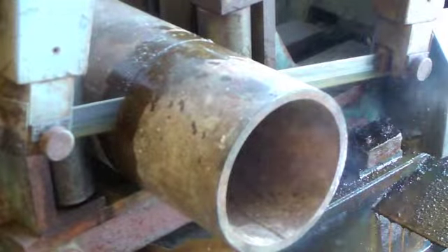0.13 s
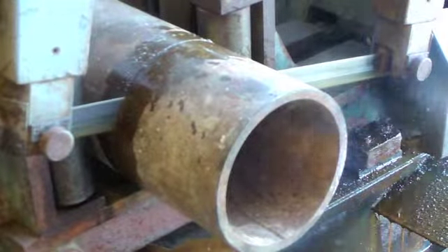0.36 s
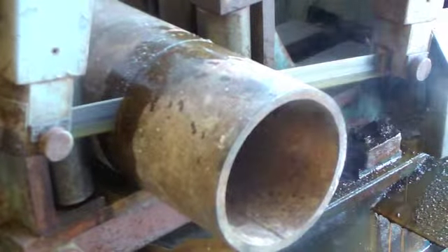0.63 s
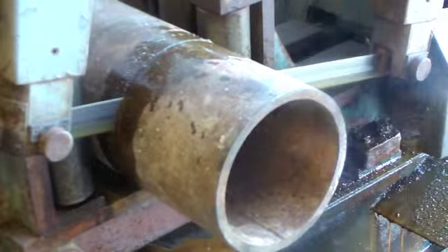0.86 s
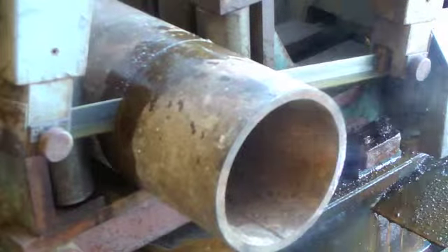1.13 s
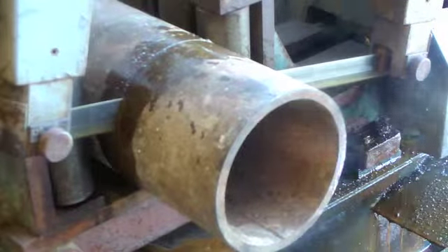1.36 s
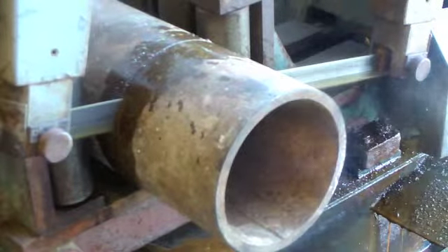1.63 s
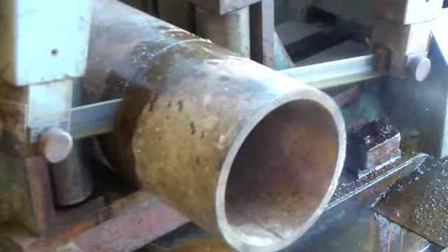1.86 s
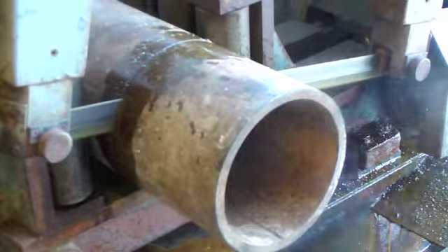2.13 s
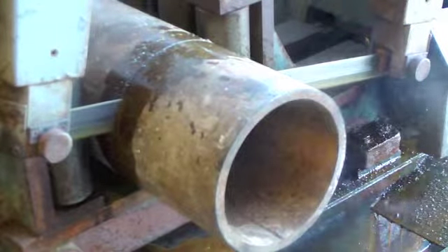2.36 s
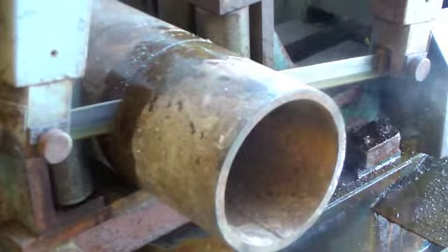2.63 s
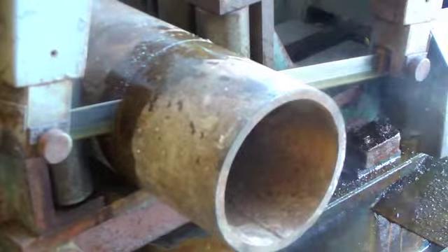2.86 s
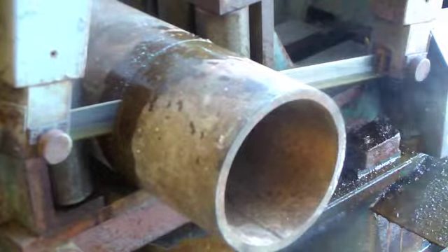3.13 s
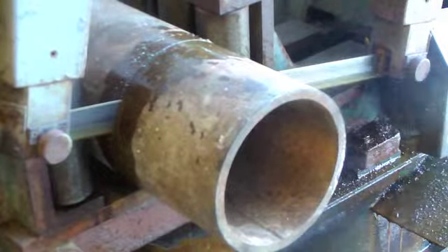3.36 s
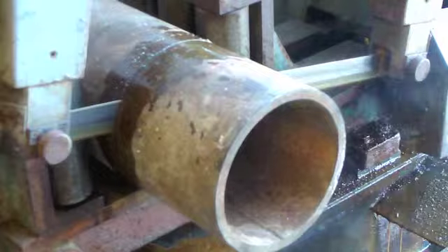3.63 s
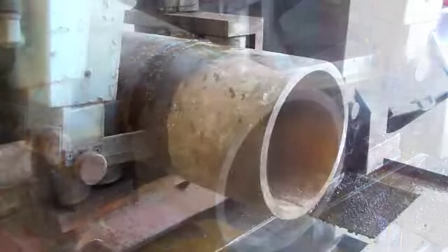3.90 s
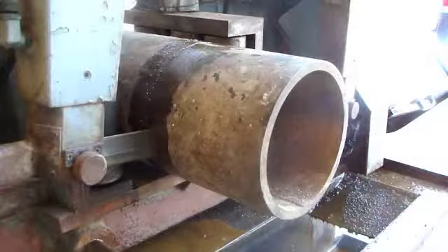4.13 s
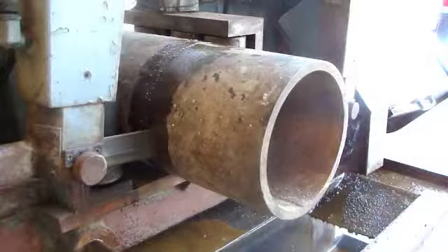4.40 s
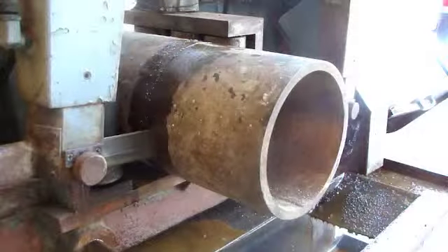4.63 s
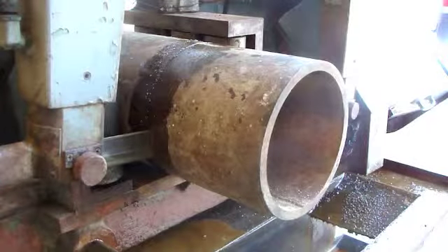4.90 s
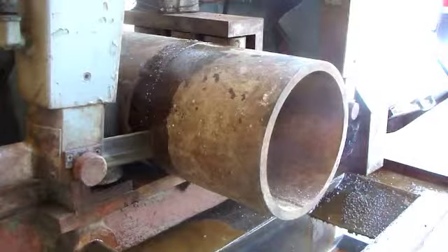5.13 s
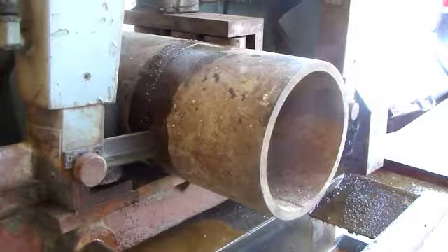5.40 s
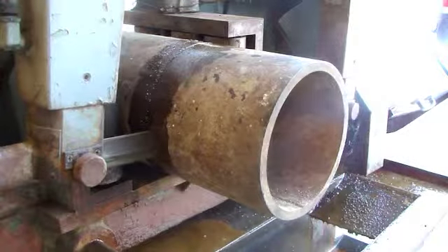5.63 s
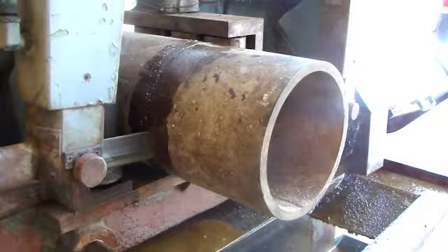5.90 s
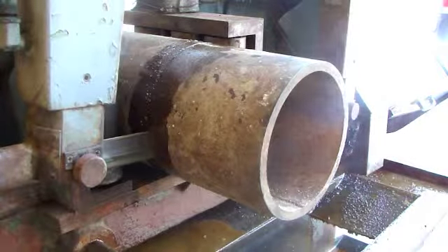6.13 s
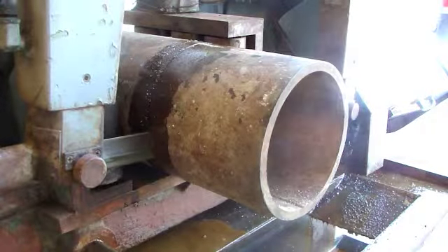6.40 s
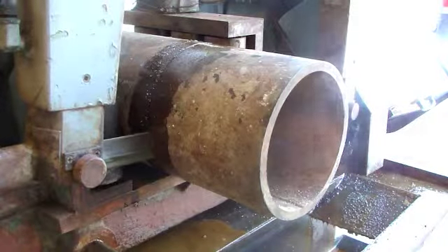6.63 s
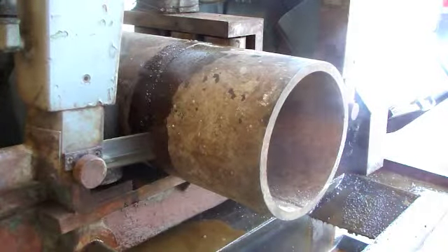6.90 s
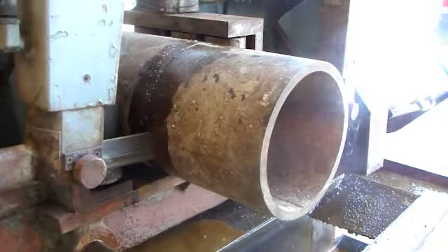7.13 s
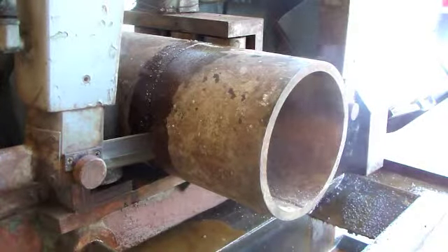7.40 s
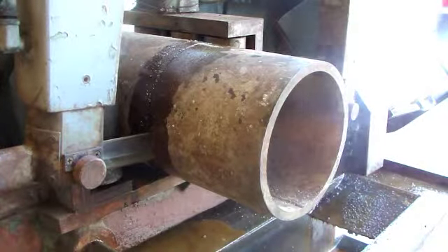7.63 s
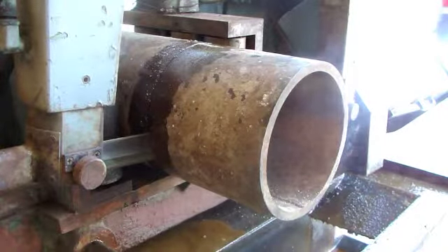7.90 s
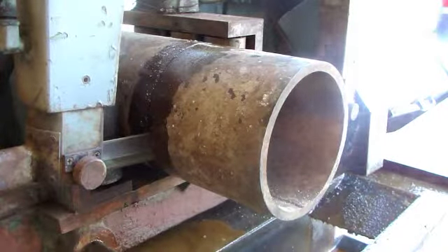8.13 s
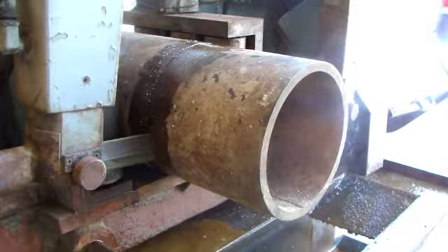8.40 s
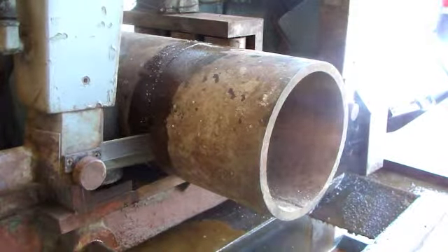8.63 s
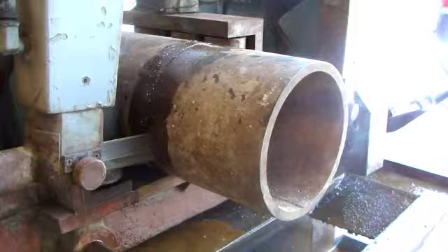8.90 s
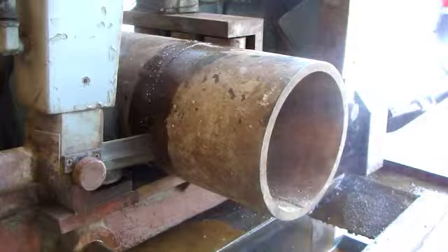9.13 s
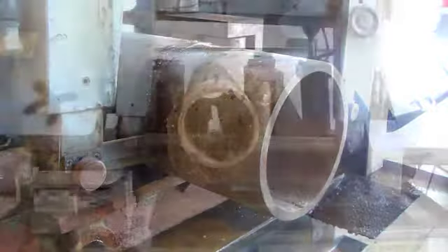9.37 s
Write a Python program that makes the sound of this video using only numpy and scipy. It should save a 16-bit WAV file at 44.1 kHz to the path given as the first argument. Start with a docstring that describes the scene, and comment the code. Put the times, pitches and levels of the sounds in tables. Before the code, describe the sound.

A band saw grinds steadily through a thick steel pipe, gritty and hissing with thin metallic squeals, then cuts louder and ends in a broad roar.

```python
"""A dense, gritty stream of tearing steel: a horizontal band saw cuts a thick pipe, heard through one
microphone. Noise and cracks, pulsed by the teeth, ring the modes of pipe, blade and frame; turning parts swell
the bite. Two thin rings and short squeaks sing above it, and a motor hums below as steady lines over filtered
noise. Midway the scene changes, blending from a shallow stage of the cut into a deeper, louder one, and near
the end the sound turns abruptly broader and louder."""
import sys
import numpy as np
from scipy import signal
from scipy.fft import rfft, irfft, next_fast_len
from scipy.io import wavfile
from scipy.ndimage import uniform_filter1d

SR = 44100
rng = np.random.default_rng(int(sys.argv[2]) if len(sys.argv) > 2 else 0)


def log_audio(samples):
    """Write samples as a 16-bit WAV file to the path given in sys.argv[1]."""
    # one column per channel
    frames = np.atleast_2d(samples).T
    # limit to full scale, then quantise
    limited = np.clip(frames, -1, 1)
    pcm = np.round(limited * 32767).astype(np.int16)
    wavfile.write(sys.argv[1], SR, pcm)


def rack_gain(trim_db):
    """Turn a fader trim in dB into the linear factor to multiply a signal by."""
    fader = np.asarray(trim_db, float)
    return 10 ** (fader / 20)


N = 419391

# borders between the six regions of the cut's spectrum: (frequency [Hz])
REGION_EDGES_HZ = [310, 750, 1450, 2470, 4000]
# resonances of pipe and frame in each stage: (frequency [Hz], width [Hz], relative level [dB])
SHALLOW_MODES = [(244, 43, -8), (325, 8, -23), (399, 15, -9), (453, 42, -10), (538, 203, -16),
                 (693, 10, -10), (751, 62, -14), (834, 45, -6), (902, 8, -9), (1139, 37, -6), (1199, 20, 1),
                 (1266, 71, -1), (1493, 146, -10), (1588, 61, -6), (1706, 58, -4), (1818, 214, -6),
                 (1999, 90, 1), (2102, 14, -8), (2296, 146, -5), (2575, 62, -1), (2973, 54, -2),
                 (3084, 142, -4), (3335, 167, -1), (3385, 40, -3), (3910, 40, -3)]
DEEP_MODES = [(243, 35, -4), (322, 8, -14), (396, 11, -8), (451, 30, -11), (551, 9, -19), (695, 22, -8),
              (783, 52, -10), (852, 40, -4), (898, 11, -3), (935, 9, -5), (971, 8, -10), (1068, 51, -2),
              (1266, 71, -4), (1540, 46, -8), (1635, 81, -7), (1827, 88, -2), (1986, 58, 0), (2064, 84, 4),
              (2263, 257, -3), (2406, 32, -2), (2720, 138, 3), (3197, 26, 3), (3369, 37, 0), (3428, 42, -4),
              (3536, 140, 0), (3704, 27, 3), (3888, 12, -4)]
# start and end of the blend from the shallow to the deep stage: (time [s])
BLEND_S = [3.76, 4.28]
# turning parts, one row for each stage: (blade wheel [Hz], guide roller [Hz], faster shaft [Hz])
TURN_HZ = [(1.05, 2.86, 6.03), (0.98, 2.86, 6.03)]
# time constants in which the stages calm down: (shallow [s], deep [s])
SETTLE_S = [0.13, 1.5]


def rms_one(x):
    """Scale to unit rms."""
    return x / np.sqrt(np.mean(x ** 2) + 1e-20)


def drift(rate):
    """Slow chance of spread 1: coarse noise through a double one-pole low-pass at rate (Hz)."""
    r = np.exp(-80 * np.pi * rate / SR)   # the coarse noise has one value per 40 samples
    coarse = rng.standard_normal(N // 40 + 1002)
    slow = signal.lfilter([1], [1, -2 * r, r * r], coarse)[1000:]
    return np.interp(np.arange(N) / 40, np.arange(len(slow)), rms_one(slow))


def resonate(x, hz, width):
    """A resonance with gain 1 on top, passed twice for steep skirts."""
    r = np.exp(-np.pi * max(width, 2) * 1.55 / SR)   # 1.55 makes up for the narrowing by two passes
    section = [(1 - r * r) / 2, 0, (r * r - 1) / 2, 1, -2 * r * np.cos(2 * np.pi * hz / SR), r * r]
    return signal.sosfilt([section, section], x)


def coloured(x, spectrum):
    """Give a white signal a spectrum; one row for each region between the edges."""
    size = next_fast_len(N)
    hz = np.maximum(np.arange(size // 2 + 1) * SR / size, 1)
    points = np.array(spectrum)
    curve_db = np.interp(np.log(hz), np.log(points[:, 0]), points[:, 1])
    shaped = rfft(x, size) * rack_gain(curve_db)
    region = np.searchsorted(REGION_EDGES_HZ, hz)
    return np.array([irfft(shaped * (region == k), size)[:N] for k in range(len(REGION_EDGES_HZ) + 1)])


def chips(tooth_depth, judder_db, per_s, spread_db, crack_db):
    """Five white streams of tearing steel: rubbing noise and cracks, pulsed by the teeth, with a common judder."""
    # one repeat of the uneven tooth spacing: (place in the repeat [0-1], bite [dB at tooth_depth 1])
    tooth_set = [(.04, 7), (.33, 7.5), (.56, 3.5)]
    set_hz = 36.03   # repeats per second
    decay = .12   # share of the repeat over which a tooth's bite fades
    place = (set_hz * np.arange(N) / SR + .04 * drift(1.5)) % 1
    teeth_db = sum(db * np.exp(-((place - at) % 1) / decay) for at, db in tooth_set)
    judder = drift(12) + 0.65 * drift(35)
    judder -= uniform_filter1d(judder, size=SR // 9)   # the slow swell belongs to the bite
    force = rack_gain(tooth_depth * teeth_db + judder_db * judder)
    heights = rack_gain(spread_db * np.minimum(rng.exponential(1, N), 5))
    sizes = heights * rng.choice([-1, 1], (5, N))
    struck = rng.random(N) < per_s * force / SR   # per_s is the crack rate at force 1
    cracks = rms_one(sizes * struck)
    rubbing = rng.standard_normal((5, N))
    return rms_one(force * (rubbing + rack_gain(crack_db) * cracks))


def cut(modes, grind, drive, grind_db, patchy_db, singing):
    """One stage of the cut by region, rms 1 each: every mode rings with a slowly changing strength of its own."""
    regions = rack_gain(grind_db) * coloured(drive[0], grind)
    for k, (hz, width, db) in enumerate(modes):
        stream = drive[1 + k % 4]   # modes next to each other in the table are rubbed by different noise
        strength = rack_gain(db + patchy_db * min(1, 160.0 / width) * drift(5.6))   # broad modes vary less
        rung = resonate(strength * stream, hz, width)
        if 40 < width < 200:
            # a cluster of close modes: part of its power sings as one thin tone that roams the cluster
            roaming = np.cos(2 * np.pi * np.cumsum(hz + .45 * width * drift(4)) / SR)
            slow_stream = signal.sosfilt(signal.butter(2, 16.0, fs=SR, output="sos"), stream)
            flares = slow_stream * rack_gain(4.5 * drift(10.0))
            tone = np.std(rung) * rms_one(flares * roaming)
            rung = np.sqrt(1 - singing) * rung + np.sqrt(singing) * tone
        regions[np.searchsorted(REGION_EDGES_HZ, hz)] += rung
    # modes trade strength with each other: the total of a region stays even, its swell comes from the bite
    return regions / np.sqrt(uniform_filter1d(regions ** 2, size=SR // 5, axis=1) + 1e-20)


def bite(rows, turn_hz, start, settle):
    """Gain of every row: it settles after the start, swells with each turning part, lurches and wanders."""
    # the blade briefly digs in (+) or runs slack (-): (time [s], level at share 1 [dB], half width [s])
    lurches = [(0.51, -1.5, 0.061), (1.33, -1.5, 0.03), (1.55, 1.5, 0.054), (1.99, 2.5, 0.022),
               (2.13, -1.9, 0.05), (2.31, 1.5, 0.021), (2.83, -0.6, 0.12), (3.01, 2.7, 0.03),
               (3.37, -1.5, 0.022), (3.72, -0.5, 0.044), (5.09, 0.5, 0.048), (5.31, 1, 0.018),
               (6.55, -1.5, 0.23), (6.97, -1, 0.02), (7.35, -0.8, 0.045), (7.59, 1.0, 0.073),
               (7.83, -1.8, 0.026), (8.17, -1.5, 0.05), (8.57, 1.7, 0.08), (9.07, 1.5, 0.05),
               (9.22, 0, 0.04)]
    # how far each row of the bite follows the lurches: (share)
    lurch_share = [0.2, 0.3, 0.91, 1.7, 0.6, 0.11, 1.2, 1.2]
    # chance wander of each row by itself: (spread [dB])
    own_wander_db = [1.35, 0.56, 0.52, 0.98, 0.48, 0.34, 2.2, 2.2]
    shared_wander_db, wander_hz = 0.2, 2.7
    step = 64   # samples between computed gains
    t = np.arange(0, N, step) / SR
    calming = np.exp(-np.maximum(t - start, 0) / settle)
    shared = shared_wander_db * drift(wander_hz)[::step]
    lurch = sum(db * np.exp(-.5 * ((t - s) / width) ** 2) for s, db, width in lurches)
    gains = []
    for (level_db, extra_db, *turns), own_db, share in zip(rows, own_wander_db, lurch_share):
        parts = zip(turn_hz, turns[::2], turns[1::2])
        swell = sum(db * np.cos(2 * np.pi * (hz * t - crest)) for hz, db, crest in parts)
        wander = shared + own_db * drift(wander_hz)[::step]
        db = level_db + extra_db * calming + swell + share * lurch + wander
        gains.append(np.interp(np.arange(N) / SR, t, rack_gain(db)))
    return np.array(gains)


def shallow_stage(fade):
    """The first stage: strong tooth pulses ring the modes; returns the sawing and the levels of the two rings."""
    # high resonances of the blade: (frequency [Hz], width [Hz], relative level [dB])
    blade = [(4010, 18, -14), (4332, 166, -13), (4795, 44, -6), (4733, 351, -8), (5016, 321, -12),
             (5307, 44, -15), (5489, 41, -6), (5759, 479, -8), (6051, 104, -11), (6168, 100, -6),
             (6364, 232, -9), (6603, 126, -10), (6873, 14, -15), (7029, 111, -13), (7285, 156, -11),
             (7817, 453, -15), (8086, 88, -15), (8706, 700, -15), (9456, 8, -15), (9582, 54, -15)]
    # grinding between the resonances: (frequency [Hz], relative density [dB per Hz])
    grind = [(90, -50), (150, -38), (300, -41), (620, -50), (1000, -10), (1420, -31), (2200, -9),
             (2850, -8), (3800, -13), (4200, -20), (5100, -50), (6700, -16), (8300, -19), (10000, -17)]
    # rows: frame boom, frame, pipe wall, low grind, high grind, chip hiss, low ring, high ring
    # (level [dB], extra at the start [dB], wheel swell [dB], its crest [0-1 turn],
    #  roller swell [dB], its crest [0-1 turn], shaft swell [dB], its crest [0-1 turn])
    bite_rows = [(-44.5, 0.0, 1.3, 0.68, 0.2, .49, 0.1, .42), (-43, 0.61, 0.3, 0.6, 0.2, .49, 0.1, 0.31),
                 (-34, 0.59, 0.94, 0.33, 2, 0.87, 0.2, .9), (-29, 1.0, 0.8, 0.35, 1.6, 0.87, 0.26, 1),
                 (-28, 1.0, 0.6, 0.35, 0.69, 0.54, 0.39, 0.74), (-26, 1.0, 0.1, .27, 0.63, 0.4, 0.2, 0.82),
                 (-44.5, 1.0, 5.6, 0.55, 4.5, 0.048, 0.99, 0.58),
                 (-38.5, 1.0, 0.91, 0.44, 5.7, 1, 3.1, 0.8)]
    drive = chips(tooth_depth=.75, judder_db=0.3, per_s=600, spread_db=4.5, crack_db=-7.0)
    regions = cut(SHALLOW_MODES + blade, grind, drive, grind_db=0.5, patchy_db=2.0, singing=0.3)
    gain = fade * bite(bite_rows, TURN_HZ[0], 0, SETTLE_S[0])
    return np.sum(gain[:-2] * regions, axis=0), gain[-2:]


def deep_stage(fade):
    """The louder second stage, with weaker tooth pulses; returns the sawing and the levels of the two rings."""
    # high resonances of the blade: (frequency [Hz], width [Hz], relative level [dB])
    blade = [(4157, 13, -10), (4640, 176, -8), (5475, 29, -5), (5650, 33, -6), (5500, 581, -7),
             (5759, 32, -3), (5903, 27, -12), (6128, 161, -6), (6562, 32, -13), (6847, 10, -9),
             (7526, 8, -16), (7578, 8, -12), (7776, 15, -11), (8937, 9, -12), (9206, 168, -15),
             (9359, 69, -12), (10381, 24, -21)]
    # grinding between the resonances: (frequency [Hz], relative density [dB per Hz])
    grind = [(90, -50), (150, -33), (300, -22), (620, -19), (1000, -41), (1420, -18), (2200, -20),
             (2850, -1), (3800, -8), (4200, -10), (5100, -19), (6700, -13), (8300, -14), (10000, -17)]
    # rows and columns as in the shallow stage: (level [dB], extra at the start [dB],
    #  then for wheel, roller and shaft: swell [dB], its crest [0-1 turn])
    bite_rows = [(-43.5, 2.9, 2, 0.31, 0.2, .54, 0.1, .3), (-44.5, 3.3, 0.46, 0.27, 0.2, 0.7, 0.1, .3),
                 (-35, 4.2, 0.64, 0.74, 0.7, 0.54, 0.16, .9), (-27, 1.9, 1.34, 0.0083, 0.1, .66, 0.23, .06),
                 (-25, 2.9, 0.5, 0.85, 0.67, 0.05, 0.15, .01),
                 (-27.5, 4.6, 0.13, 0.78, 0.13, .11, 0.12, 0.34), (-59, 12, 1.5, .98, 11.6, 0.52, 0.72, 1),
                 (-32, 0.65, 0.7, 0.31, 0.32, .14, 0.75, 1)]
    drive = chips(tooth_depth=.45, judder_db=0.86, per_s=600, spread_db=2.5, crack_db=-9.5)
    regions = cut(DEEP_MODES + blade, grind, drive, grind_db=0.06, patchy_db=2.0, singing=0.21)
    gain = fade * bite(bite_rows, TURN_HZ[1], BLEND_S[1], SETTLE_S[1])
    return np.sum(gain[:-2] * regions, axis=0), gain[-2:]


def squeal(deep, levels, rough, width):
    """Nearly steady rings, each with a fringe of noise around it; the pitch differs between the two stages and
    glides across the blend."""
    # the two sharpest rings of the pipe: (shallow pitch [Hz], deep pitch [Hz])
    squeal_hz = [(1043.5, 1050), (2927, 2918)]
    rings = np.zeros(N)
    low = signal.butter(1, width, fs=SR, output="sos")   # width in Hz to each side of the ring
    for (shallow_hz, deep_hz), level in zip(squeal_hz, levels):
        real, imaginary = signal.sosfilt(low, rng.standard_normal((2, N)))
        fringe = rough * (rms_one(real) + 1j * rms_one(imaginary))
        hz = shallow_hz + deep * (deep_hz - shallow_hz)
        carrier = np.exp(2j * np.pi * np.cumsum(hz) / SR)
        rings += level * rms_one(np.real((1 + fringe) * carrier))
    return rings


def motor(deep):
    """Motor, gears and pump: steady lines that waver a little, over a low rumble."""
    # motor lines: (frequency [Hz], shallow level [dB rms], deep level [dB rms])
    hum = [(37.7, -86, -87), (60.2, -88, -93), (75.4, -82, -89), (88.5, -85, -81), (114.4, -78, -81),
           (120.1, -79, -71), (177.6, -56, -62), (360.0, -59, -66), (396.0, -57, -57), (503.7, -58, -72)]
    # rumble spectrum: (frequency [Hz], relative density [dB per Hz])
    rumble = [(12, -58), (20, -28), (49, -20), (119, -3.5), (170, 0), (220, -15), (370, -120)]
    rumble_db = -65 + 2.0 * deep + 0.77 * drift(0.67)
    lowest_region = coloured(rng.standard_normal(N), rumble)[0]
    out = rack_gain(rumble_db) * rms_one(lowest_region)
    for hz, shallow_db, deep_db in hum:
        level = rack_gain(shallow_db + deep * (deep_db - shallow_db) + 2.0 * drift(0.26))
        out += np.sqrt(2) * level * np.sin(2 * np.pi * hz * np.arange(N) / SR + .5 * drift(1.0))
    return out


def faint_squeaks():
    """Random rows for squeaks(), at chance times, each on one of the stage's middle modes."""
    # range of the middle modes: (lowest [Hz], highest [Hz])
    lowest_hz, highest_hz = (1150, 3750)
    # range of lengths at half height: (shortest [s], longest [s])
    short, long = (0.04, 0.1)
    count, middle_db, range_db = 24, -32.0, 11
    rows = []
    for when, strength, which, length in rng.random((count, 4)):
        s = long + when * (N / SR - long)
        modes = SHALLOW_MODES if s < np.mean(BLEND_S) else DEEP_MODES
        pitches = [hz for hz, _, _ in modes if lowest_hz < hz < highest_hz]
        peak_db = middle_db + range_db * (strength - .5)
        rows.append((s, peak_db, pitches[int(which * len(pitches))], short + length * (long - short)))
    return rows


def squeaks():
    """A tooth grabs and one mode sings out: a short swell and fade on a slightly unsteady pitch."""
    # the loudest squeaks: (time of the peak [s], peak before chatter [dB], pitch [Hz], length at half height [s])
    loudest = [(0.053, -28, 2900, 0.047), (0.292, -24.5, 2002.0, 0.03), (0.322, -31, 1043.0, 0.074),
               (0.399, -20.5, 2020, 0.035), (0.98, -26, 1740.0, 0.031), (0.982, -30, 3403.0, 0.1),
               (1.258, -29, 3280, 0.05), (1.397, -22.5, 2927.0, 0.05), (1.513, -33, 1043.0, 0.06),
               (1.584, -32, 3350, 0.1), (1.635, -24, 1930, 0.03), (1.72, -25, 2927.0, 0.06),
               (1.999, -26, 3395.0, 0.08), (2.044, -25, 2020.0, 0.03), (2.329, -30, 1208.0, 0.063),
               (2.436, -38, 1043.0, 0.052), (2.5, -29, 3400, 0.05), (3.44, -29, 3414.0, 0.05),
               (3.446, -25.5, 1748.0, 0.037), (3.565, -25, 1999.0, 0.05), (3.861, -25.5, 1916.0, 0.046),
               (4.086, -17, 2920.0, 0.042), (4.25, -24, 3550, 0.036), (4.283, -23, 2080, 0.05),
               (4.339, -28, 1050.0, 0.05), (4.69, -27, 2918.0, 0.05), (4.943, -27, 2692.0, 0.068),
               (5.091, -26.5, 1050.0, 0.06), (5.275, -26, 2930, 0.08), (5.334, -19, 2010, 0.03),
               (5.657, -28, 2668.0, 0.1), (5.67, -27, 2085.0, 0.068), (5.983, -20, 2040.0, 0.025),
               (6.468, -22, 2930, 0.076), (6.524, -23.5, 2006, 0.04), (6.8, -25, 2031.0, 0.053),
               (7.05, -21.5, 2030.0, 0.042), (7.15, -28, 1050.0, 0.06), (7.443, -26, 2918.0, 0.04),
               (7.788, -20, 2918.0, 0.06), (8.035, -23, 2020, 0.05), (8.324, -26, 1990, 0.06),
               (8.61, -21, 2918.0, 0.04), (8.993, -20, 2116, 0.04), (9.11, -23, 2034.0, 0.08)]
    rows = loudest + faint_squeaks()
    out, unsteady, chatter = np.zeros(N), drift(21.3), drift(40)
    for (s, peak_db, hz, length), turn in zip(rows, rng.random((len(rows), 1))):
        span = np.arange(round((s - length) * SR), min(round((s + length) * SR), N))
        phase = 2 * np.pi * (np.cumsum(hz + 8.6 * unsteady[span]) / SR + turn)
        level = rack_gain(peak_db + 2.0 * chatter[span])
        out[span] += level * np.hanning(len(span)) * np.sin(phase)
    return out


def closing_roar():
    """White noise shaped to a broad spectrum, raised abruptly near the end."""
    # (frequency [Hz], relative density [dB per Hz])
    spectrum = [(15, -77), (25, -36), (228, -12), (302, -14), (836, -5), (1430, -10), (2830, -1),
                (6070, -6.5), (10900, -13.5), (14200, -51), (22000, -120)]
    # (time [s], level [dB])
    level = [(9.258, -80), (9.266, -23.5), (9.51, -23)]
    times, level_db = np.transpose(level)
    gain = rack_gain(np.interp(np.arange(N) / SR, times, level_db))
    return gain * rms_one(coloured(rng.standard_normal(N), spectrum).sum(axis=0))


def scene():
    """Each stage has its own bite; one fades out as the other fades in."""
    deep = np.interp(np.arange(N) / SR, BLEND_S, [0, 1])
    fade_power = 0.47   # .5 keeps the power even, 1 is a straight line
    shallow_saw, shallow_rings = shallow_stage((1 - deep) ** fade_power)
    deep_saw, deep_rings = deep_stage(deep ** fade_power)
    rings = squeal(deep, np.hypot(shallow_rings, deep_rings), rough=0.43, width=8.9)
    mix = shallow_saw + deep_saw + rings + motor(deep) + squeaks() + closing_roar()
    return np.tile(mix, (2, 1))   # the same sound on both channels


def low_pass(x):
    """Removes everything above the highest recorded frequency."""
    return signal.sosfilt(signal.butter(12, 11560, fs=SR, output="sos"), x)


def record(dry):
    """Peaks are rounded, the microphone fades at both ends of the spectrum, and the top is cut steeply."""
    ceiling = .85
    low_end = signal.butter(2, 60.0, "high", fs=SR, output="sos")
    high_end = signal.butter(8, 10350.0, fs=SR, output="sos")
    steep_cut = signal.ellip(12, .3, 55, 10990, fs=SR, output="sos")
    rounded = ceiling * np.tanh(dry / ceiling)
    heard = signal.sosfilt(np.vstack([low_end, high_end]), rounded)
    return low_pass(signal.sosfilt(steep_cut, heard))


dry = scene()
out = record(dry)
log_audio(out)
```